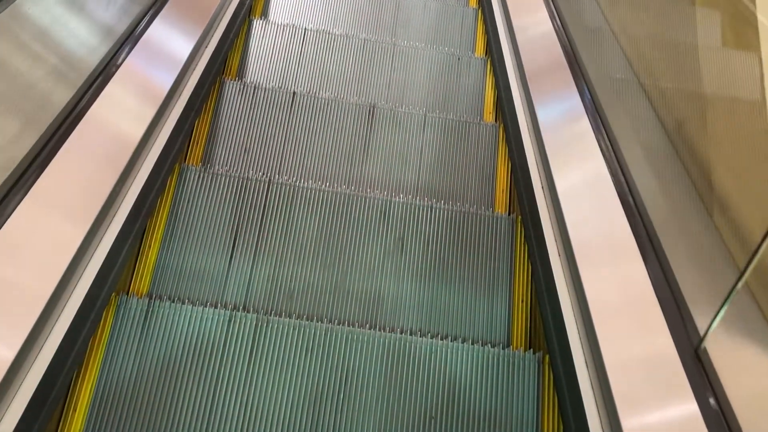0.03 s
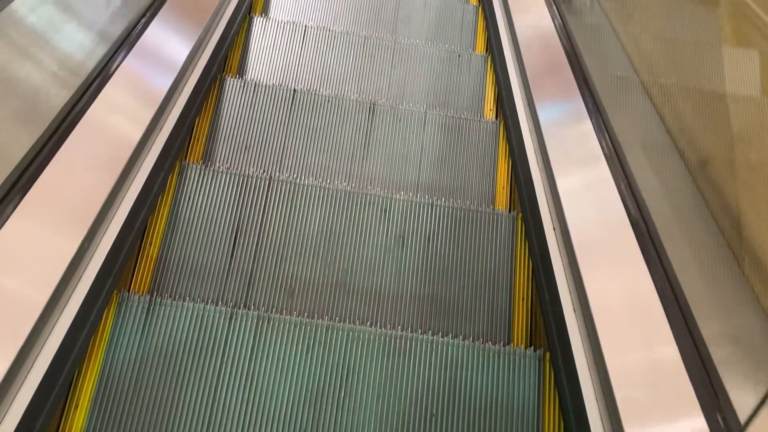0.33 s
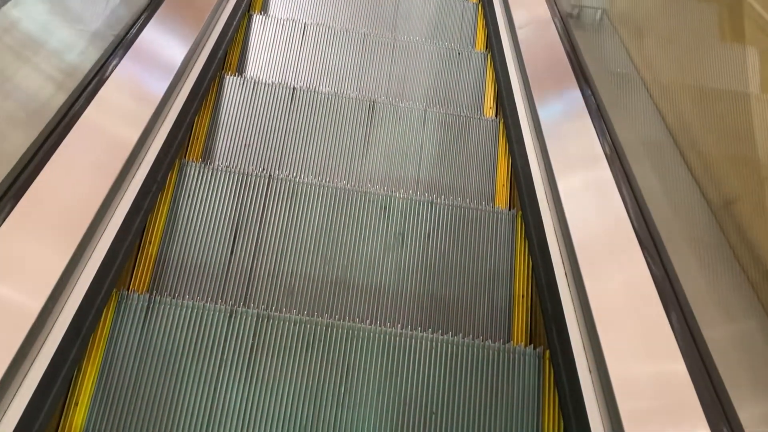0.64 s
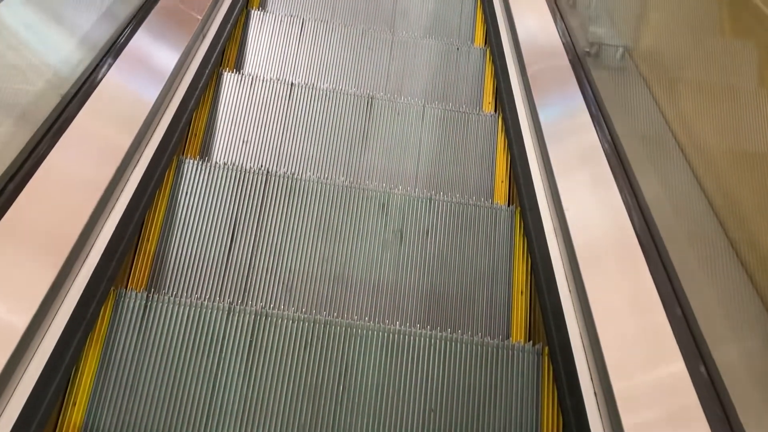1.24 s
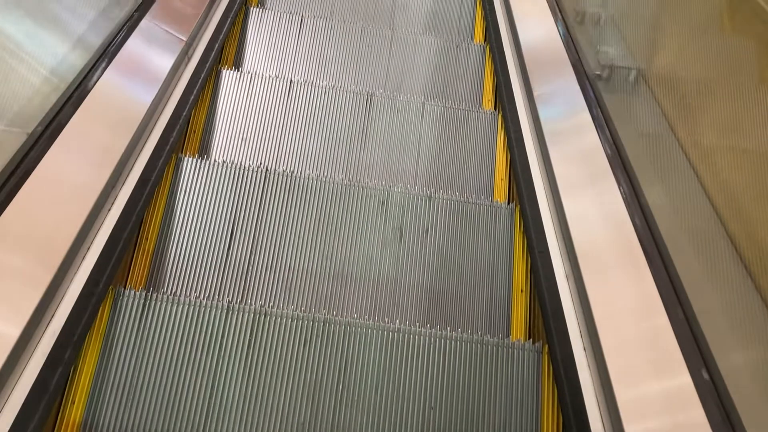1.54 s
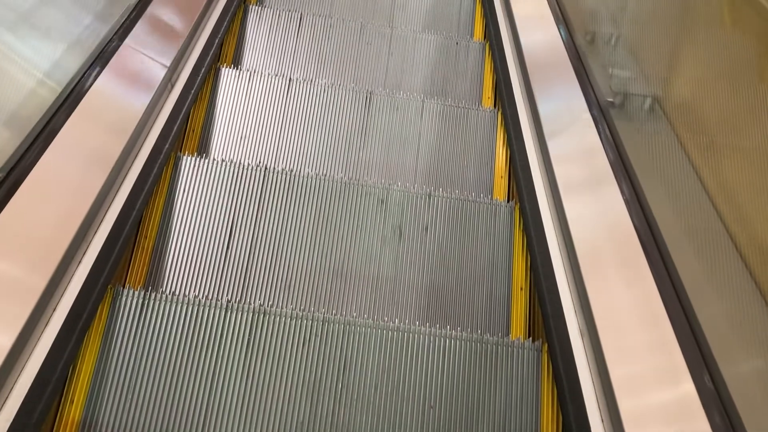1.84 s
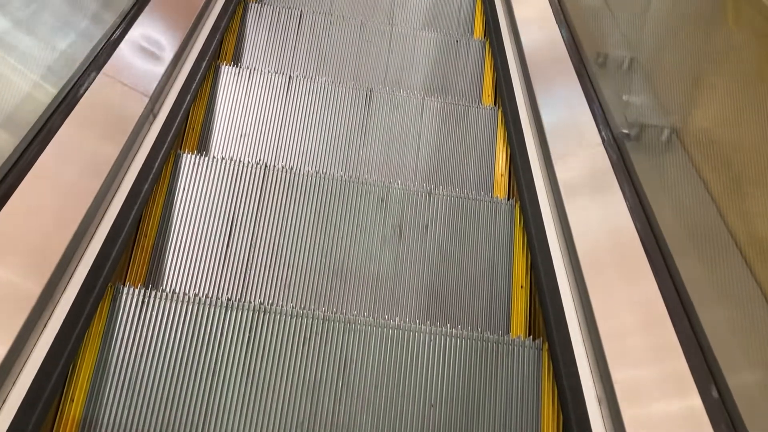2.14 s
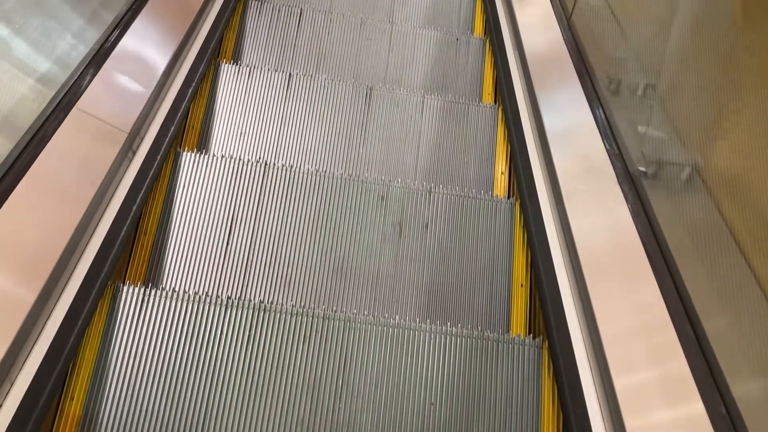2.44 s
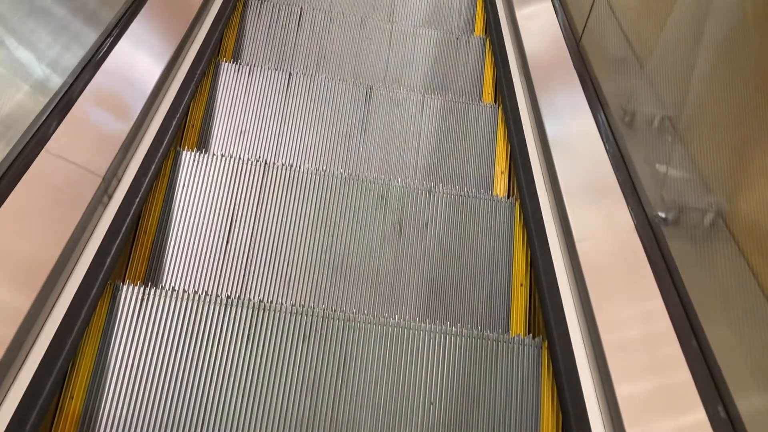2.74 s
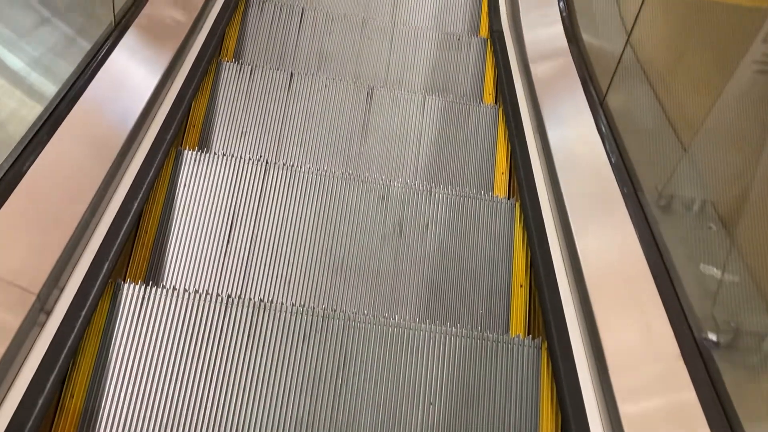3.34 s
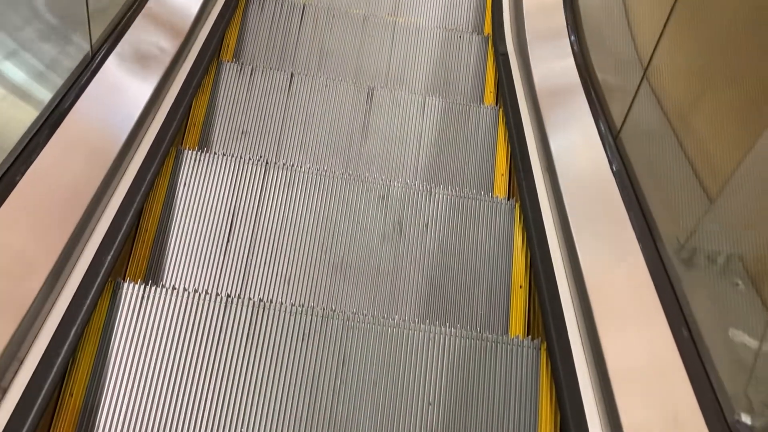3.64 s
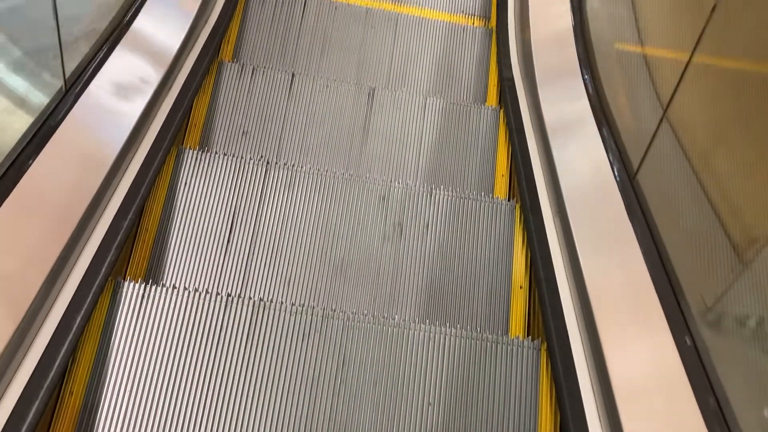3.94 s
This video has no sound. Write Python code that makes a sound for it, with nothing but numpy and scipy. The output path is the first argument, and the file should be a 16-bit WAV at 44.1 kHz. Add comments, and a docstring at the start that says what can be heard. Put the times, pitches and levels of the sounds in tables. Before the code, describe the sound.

Heard while riding it inside a building, an escalator rumbles and hums throughout. Its rollers thump and loose steps knock unevenly; later the step edges scrape lightly and click, and the rubber handrail squeaks faintly near the end.

```python
"""An escalator in a large hall, heard from its moving steps. From the start the truss rumbles, rollers
run on their tracks and shake the panels, the handrail hisses and the drive hums. Almost at once rollers
begin to boom over track joints; from 0.6 s loose steps knock dully and a gear tone swells and fades.
At 1.7 s the rasp of steps along the skirt comes up, and until 2.9 s their edges catch on it and click.
From 3.4 s the rubber handrail gives three faint squeaks."""
import sys
import numpy as np
from scipy import signal
from scipy.fft import rfft, irfft
from scipy.io import wavfile
from scipy.ndimage import uniform_filter1d

SR = 44100
rng = np.random.default_rng(int(sys.argv[2]) if len(sys.argv) > 2 else 0)


def to_wav(s):
    """Save 16-bit WAV."""
    ch = np.atleast_2d(s).T  # columns
    pcm = np.round(np.clip(ch, -1, 1) * 32767)  # PCM
    wavfile.write(sys.argv[1], SR, pcm.astype(np.int16))


N = 176400
T = np.arange(N) / SR


def from_db(db):
    """Decibels to gain."""
    return 10 ** (np.asarray(db) / 20)


def rms_one(x):
    """Scale to rms 1."""
    return x / np.sqrt(np.mean(x ** 2) + 1e-20)


def in_time(rows):
    """Read a fader curve at every sample."""
    return np.interp(T, *np.transpose(rows))


def at_hz(points, hz):
    """Read a curve on a log-frequency axis."""
    f, value = np.transpose(points)
    return np.interp(np.log(hz), np.log(f), value)


def drift(rate_hz):
    """Smooth random modulation of rms 1."""
    hop, settle = 40, 2000
    pole = np.exp(-2 * np.pi * rate_hz * hop / SR)
    white = rng.standard_normal(N // hop + settle + 2)
    slow = signal.lfilter([1], [1, -2 * pole, pole * pole], white)[settle:]
    return np.interp(np.arange(N) / hop, np.arange(len(slow)), rms_one(slow))


def band(x, low_hz, high_hz):
    """Band-pass filter."""
    edges = [low_hz, min(high_hz, SR / 2 - 100)]
    return signal.sosfilt(signal.butter(2, edges, "band", fs=SR, output="sos"), x)


def pan(db):
    """Stereo gains, the left db above the right."""
    return from_db(np.array([[db], [-db]]) / 2)


def add(out, s, sound):
    """Mix a sound in at time s."""
    i = int(s * SR)
    out[:, i:i + sound.shape[1]] += sound[:, :max(N - i, 0)]


# Stereo width: f/Hz, left-right correlation
CORRELATION = [(60, .985), (130, .9), (290, .52), (640, .28), (1000, .06), (3100, .1), (6000, -.1)]
# Stereo lean: f/Hz, left minus right/dB
LEAN = [(150, -1), (380, 2.5), (700, 0.5), (1300, 3), (2400, 3), (4400, 0.5), (8000, 3)]
def spread(pair, hz):
    """Two unrelated sounds become mid and side: narrow in the bass, wide in the treble."""
    alike = at_hz(CORRELATION, hz)
    mid = np.sqrt(1 + alike) * pair[0]
    side = np.sqrt(1 - alike) * pair[1]
    return np.array([mid + side, mid - side]) * pan(at_hz(LEAN, hz))


def noise_bed(spectrum, low_hz, bands, flicker_db, flicker_hz):
    """Third-octave bands of stereo noise upward from low_hz, each flickering on its own; rms 1."""
    out, white = 0, rng.standard_normal((2, 2, N))
    edges = low_hz * 2 ** (np.arange(bands + 1) / 3)
    for k, (low, high) in enumerate(zip(edges, edges[1:])):
        hz = np.sqrt(low * high)
        gain = from_db(at_hz(spectrum, hz) + flicker_db * drift(flicker_hz))
        out = out + gain * spread(band(white[k % 2], low, high), hz)
    return rms_one(out)


def pitched_noise(hz, width_hz, size):
    """A narrow band of stereo noise; rms 1."""
    white = rng.standard_normal((2, size))
    return rms_one(spread(band(white, hz - width_hz / 2, hz + width_hz / 2), hz))


def tone(hz, waver_hz):
    """A wavering sine of rms 1."""
    pitch = hz + waver_hz * drift(4.76)
    return np.sqrt(2) * np.sin(2 * np.pi * np.cumsum(pitch) / SR)


def ringing(hz, width_hz):
    """One second of a rattled mode, in stereo at rms 1: the wider it is, the faster its phase wanders."""
    wander = np.cumsum(rng.standard_normal((2, SR)), axis=1) * np.sqrt(2 * np.pi * width_hz / SR)
    sines = np.sin(2 * np.pi * hz * T[:SR] + wander)
    return rms_one(spread(band(sines, hz / np.sqrt(2), hz * np.sqrt(2)), hz))


def struck(sound, attack_s, length_s, hall_db=-14, hall_t60_s=0.5):
    """Shape a steady sound's last half second into a hit: attack, short rattle, hall tail."""
    t = T[:SR // 2]
    after = np.maximum(t - attack_s, 0)
    rattle = np.exp(-(after / length_s) ** 2 / 2)
    tail = from_db(hall_db - 60 * after / hall_t60_s)
    return sound[:, -len(t):] * np.minimum(t / attack_s, 1) * np.hypot(rattle, tail)


# Rumble EQ: f/Hz, relative level/dB
RUMBLE_EQ = [(31, -5), (42, -5.5), (60, 0.5), (80, 1.5), (105, 0), (140, -3.5), (200, -5)]
# Rumble fader: t/s, level/dB
RUMBLE_FADER = [(0, -28), (.17, -35), (.21, -39), (.3, -36.5), (.38, -34), (.5, -32.5), (.55, -36),
                (.6, -32), (.8, -36.5), (.88, -33), (1.05, -38.5), (1.22, -34.5), (1.38, -36),
                (1.52, -35.5), (1.64, -34.5), (1.75, -35), (2.18, -34), (2.45, -33), (2.68, -39.5),
                (2.78, -34.5), (2.92, -34.5), (3.16, -32), (3.55, -36), (3.72, -35.5), (3.82, -34.5),
                (4, -34.5)]
def truss_rumble():
    """The truss rumbles, an uneven low bed under everything."""
    bed = noise_bed(RUMBLE_EQ, low_hz=27.38, bands=9, flicker_db=-1.3, flicker_hz=7.3)
    return from_db(in_time(RUMBLE_FADER)) * bed


# Roller EQ: f/Hz, relative level/dB
ROLLER_EQ = [(250, 2), (320, 1), (400, -3.5), (490, -4), (620, -5.5), (780, -8.5), (1000, -13), (1250, -16),
             (1550, -23.5), (2000, -21), (2500, -26.5), (3200, -32.5), (4100, -31), (5000, -40),
             (6300, -87)]
# Roller fader: t/s, level/dB
ROLLER_FADER = [(0, -39.5), (.5, -38.5), (1.1, -39), (1.45, -37.5), (1.7, -37), (2.05, -38.5),
                (2.45, -35.5), (2.65, -37), (2.9, -38.5), (3.2, -37.5), (3.6, -36.5), (4, -37)]
def rollers():
    """Rollers run on their tracks and fill the low mids."""
    bed = noise_bed(ROLLER_EQ, low_hz=214.7, bands=15, flicker_db=2.43, flicker_hz=5.1)
    return from_db(in_time(ROLLER_FADER)) * bed


# Rasp EQ: f/Hz, relative level/dB
RASP_EQ = [(1400, 1.5), (1800, 3.5), (2250, 3), (2800, -1), (3500, -5.5), (4300, -6), (5500, -29)]
# Rasp fader: t/s, level/dB
RASP_FADER = [(0, -60), (1.1, -58.5), (1.5, -60), (1.7, -52), (1.85, -54), (2.02, -54.5), (2.28, -54.5),
              (2.5, -56), (2.7, -60), (2.85, -51), (2.93, -51), (3.02, -51.5), (3.3, -58), (3.55, -53.5),
              (3.72, -58.5), (3.84, -50.5), (3.9, -55.5), (4, -56)]
def skirt_rasp():
    """Steps slide along the skirt; the rubbing catches and lets go."""
    gain = from_db(in_time(RASP_FADER) - 0.66 * drift(rate_hz=8))
    return gain * noise_bed(RASP_EQ, low_hz=1238, bands=6, flicker_db=3.5, flicker_hz=13)


# Panel resonances: f/Hz, width/Hz, level/dB
PANEL_MODES = [(445.8, 14, -52), (566, 16, -54), (882.4, 65, -62.5), (1472, 40, -63.5), (1575, 39, -64.5)]
def panels():
    """Shaken by the rollers, the panels ring softly and steadily."""
    return sum(from_db(db) * pitched_noise(hz, width_hz, N) for hz, width_hz, db in PANEL_MODES)


# Hiss EQ: f/Hz, relative level/dB
HISS_EQ = [(5000, 2.5), (6500, 7), (7500, 5.5), (9300, 3.5), (11000, 4.5), (12500, -2), (15000, -6)]
# Hiss fader: t/s, level/dB
HISS_FADER = [(0, -62), (1.4, -62), (1.6, -61.5), (2.65, -62), (2.9, -60), (3.08, -61), (3.16, -62),
              (3.38, -61), (3.48, -60.5), (4, -59.5)]
def handrail_hiss(lag_s=.00022):
    """A fine hiss from one spot close on the right; it reaches the left later, polarity flipped."""
    hz = np.maximum(np.arange(N // 2 + 1) * SR / N, 1)
    air = band(rng.standard_normal(N), HISS_EQ[0][0], SR / 2)
    right = rfft(air) * from_db(at_hz(HISS_EQ, hz))
    left = -right * np.exp(-2j * np.pi * hz * lag_s)
    return from_db(in_time(HISS_FADER)) * rms_one(irfft(np.array([left, right]), N))


# Motor tones: f/Hz, level/dB, waver/Hz
MOTOR_TONES = [(57.5, -45.5, 3.15), (1075, -64, 4.94)]
# Gear fader: t/s, level/dB
GEAR_FADER = [(0, -53), (.4, -55), (.8, -46), (1.3, -46), (2.0, -50.5), (2.55, -43), (3.0, -47), (3.5, -45),
              (4, -71)]
def drive():
    """The motor hums in the centre; left of it a gear tone swells and fades."""
    hum = sum(from_db(db) * tone(hz, waver_hz) for hz, db, waver_hz in MOTOR_TONES)
    gear = from_db(in_time(GEAR_FADER)) * tone(hz=360.2, waver_hz=1.0)
    return hum + pan(db=5) * gear


# Track joint cues: t/s, level/dB
BUMP_CUES = [(0.106, -23), (0.344, -27), (1.34, -22.5), (1.817, -25), (1.912, -25), (2.14, -23),
             (2.427, -26.5), (2.619, -31), (3.564, -27)]
def joint_bumps(hz=60, t60_s=0.24):
    """A roller drops over a joint and the truss gives one short, low boom."""
    out, t = np.zeros((2, N)), T[:SR // 2]
    attack = np.minimum(2 * hz * t, 1)  # half a cycle
    boom = np.sin(2 * np.pi * hz * t) * attack * from_db(-60 * t / t60_s)
    for s, db in BUMP_CUES:
        add(out, s, from_db(db) * boom[None])
    return out


# Knock cues: t/s, thud level/dB, thud f/Hz, ring level/dB, ring f/Hz, rattle length/s
KNOCK_CUES = [(0.626, -36, 246, -31.5, 539.6, 0.036), (0.675, -35.5, 189.7, -36, 443, 0.044),
              (1.246, -38, 261, -42, 559, 0.026), (1.285, -30.5, 254.6, -48, 576, 0.018),
              (1.522, -27, 260.5, -32.5, 565, 0.01), (1.736, -37, 287, -33.5, 554, 0.0058),
              (2.158, -29, 217.5, -41, 596, 0.035), (2.195, -35, 312, -36.5, 608, 0.031),
              (2.341, -29, 279.3, -33, 549.3, 0.0096), (2.36, -32, 174.9, -37, 737, 0.017),
              (2.39, -38.5, 221.3, -33, 548.5, 0.026), (3.026, -32.5, 266.6, -37, 546, 0.036),
              (3.078, -40, 279.4, -37.5, 761, 0.011), (3.285, -37, 277.4, -29.5, 470, 0.046),
              (3.605, -55, 283.5, -40, 605.5, 0.088), (3.793, -32, 218, -59, 493, 0.03),
              (3.854, -37, 182.9, -47, 600, 0.21)]
def step_knocks():
    """A loose step rattles briefly: its frame thuds and its tread rings with one overtone."""
    out = np.zeros((2, N))
    for s, thud_db, thud_hz, ring_db, ring_hz, length_s in KNOCK_CUES:
        thud = (thud_db, thud_hz, 5.96)  # level/dB, f/Hz, Q
        ring = (ring_db, ring_hz, 10.6)
        overtone = (ring_db - 16, ring_hz * 2.08, 3.94)
        for db, hz, q in (thud, ring, overtone):
            add(out, s, from_db(db) * struck(ringing(hz, hz / q), attack_s=.009, length_s=length_s))
    return out


def crackle(hz, top_hz, contacts_per_s=5000, span=1.8, ride_s=.025):
    """One second of tiny random contacts, the gain ridden to hold rms near 1 and keep the grain."""
    contacts = rng.standard_normal((2, SR)) * (rng.random((2, SR)) < contacts_per_s / SR) + 1e-18
    dulled = signal.sosfilt(signal.butter(4, top_hz, fs=SR, output="sos"), contacts)
    grit = spread(band(dulled, hz / span, hz * span), hz)
    power = uniform_filter1d(np.mean(grit ** 2, axis=0), int(ride_s * SR))
    return grit / np.sqrt(np.maximum(power, 1e-20))


# Modes of a step: f/Hz, width/Hz, relative level/dB
STEP_RING = [(170.7, 22, 12), (546, 27.5, 12.5), (793, 40, 5), (1026, 49, -0.5), (1280, 74, -16),
             (1503, 56, 2), (1596, 55, -6), (2240, 260, -18), (2710, 450, -31), (3210, 180, -17),
             (4100, 264, -10), (4620, 313, -14.5), (5860, 530, -17)]
# Click cues: t/s, ring level/dB, crack level/dB, crack f/Hz, high cut/Hz, length/s
CLICK_CUES = [(1.733, -36, -37, 1340, 5170, 0.0057), (1.814, -64, -57, 3400, 4800, .018),
              (2.341, -22.5, -52.5, 2000, 6000, 0.017), (2.76, -66, -51, 3400, 7500, 0.0074),
              (2.797, -44, -46, 1880, 5620, 0.026), (2.832, -60, -59, 2400, 4200, 0.02),
              (2.884, -64, -53, 2600, 5500, .016)]
def edge_clicks():
    """A step edge catches on the skirt: a dry crack, and the step's modes ring."""
    out = np.zeros((2, N))
    for s, ring_db, crack_db, crack_hz, top_hz, length_s in CLICK_CUES:
        ring = sum(from_db(db) * ringing(hz, width_hz) for hz, width_hz, db in STEP_RING)
        click = from_db(ring_db) * rms_one(ring) + from_db(crack_db) * crackle(crack_hz, top_hz)
        add(out, s, pan(db=2) * struck(click, attack_s=0.0014, length_s=length_s))
    return out


# Squeak cues: t/s, length/s, f/Hz, level/dB
SQUEAK_CUES = [(3.368, 0.17, 2000, -54), (3.652, 0.087, 1830, -55), (3.747, 0.071, 1820, -49.5)]
def handrail_squeaks():
    """The rubber handrail sings faintly for a moment."""
    out = np.zeros((2, N))
    for s, length_s, hz, db in SQUEAK_CUES:
        size = int(length_s * SR)
        squeak = pitched_noise(hz, width_hz=150, size=SR)[:, -size:]
        add(out, s, from_db(db) * squeak * np.sqrt(np.hanning(size)))
    return out


def scene():
    """The running bed, with the hits and squeaks on top."""
    bed = truss_rumble() + rollers() + skirt_rasp() + panels() + handrail_hiss() + drive()
    return bed + joint_bumps() + step_knocks() + edge_clicks() + handrail_squeaks()


def record(dry):
    """The microphone loses the deepest bass; a steep high cut takes off the top."""
    low_cut = signal.butter(6, 34, "high", fs=SR, output="sos")
    high_cut = signal.ellip(10, .1, 80, 15800, fs=SR, output="sos")
    return signal.sosfilt(high_cut, signal.sosfilt(low_cut, dry))


dry = scene()
out = record(dry)
to_wav(out)
```